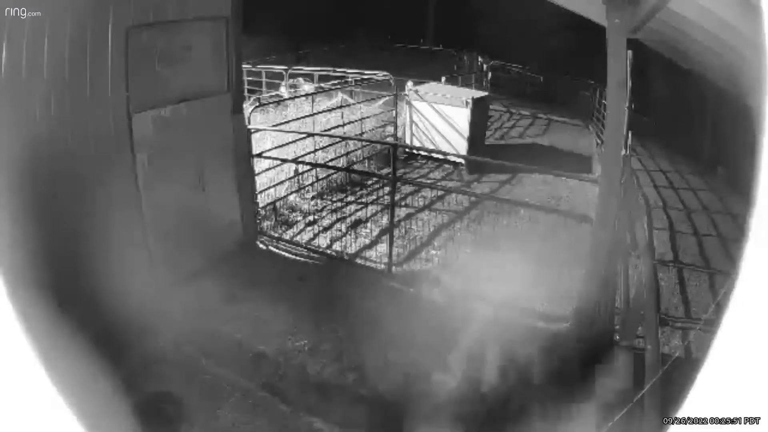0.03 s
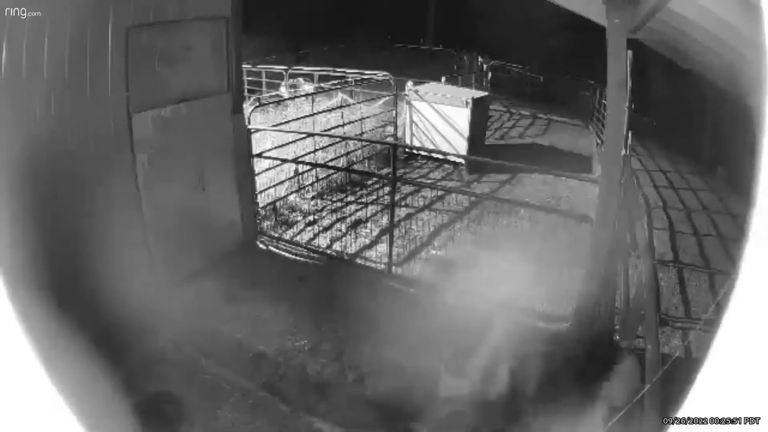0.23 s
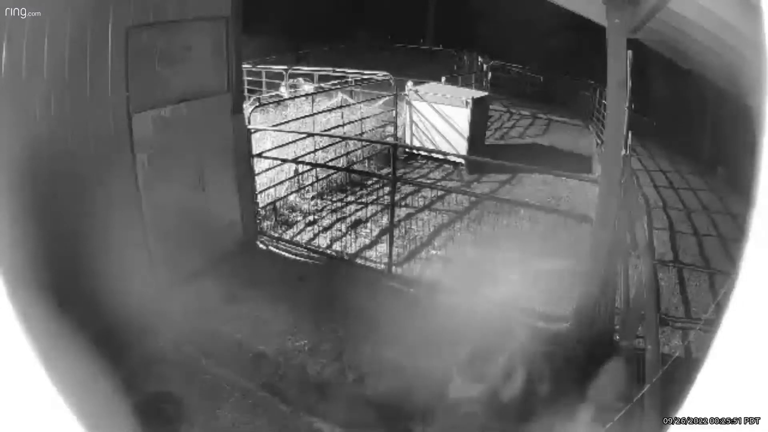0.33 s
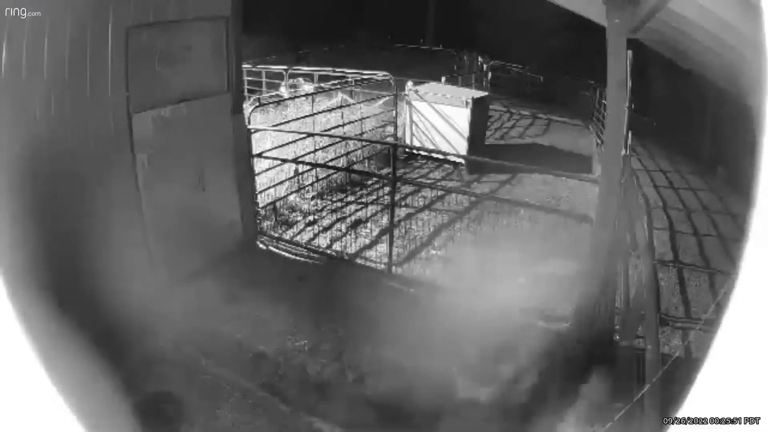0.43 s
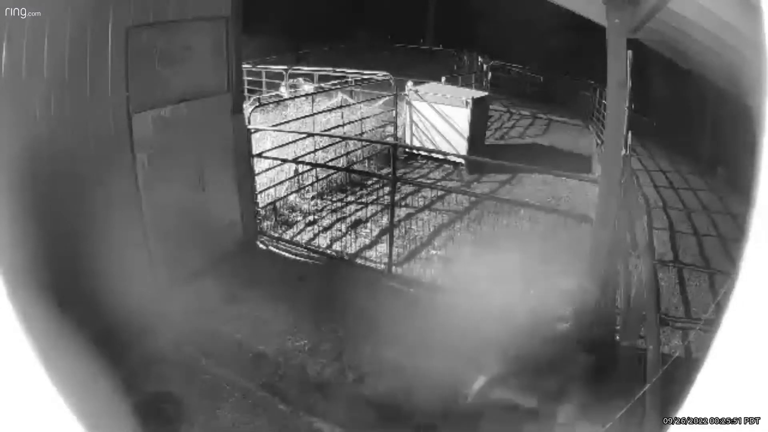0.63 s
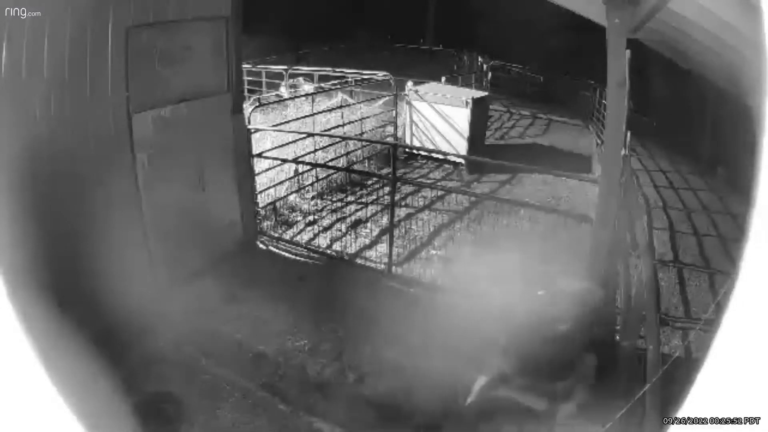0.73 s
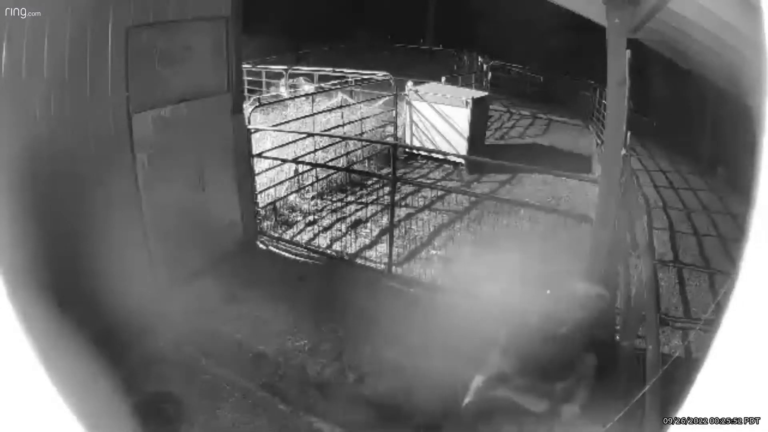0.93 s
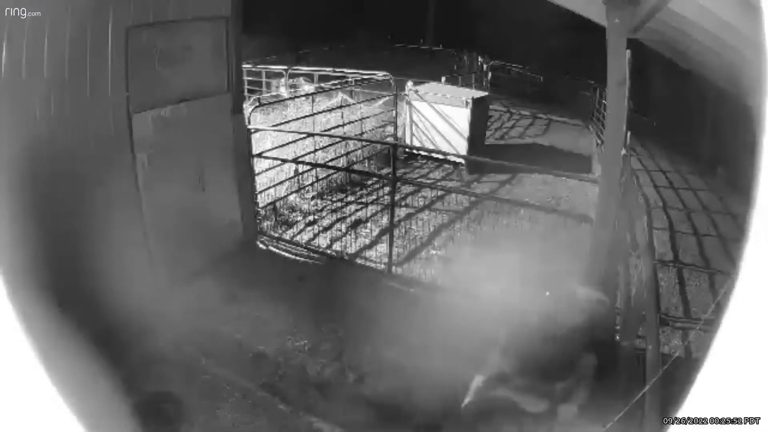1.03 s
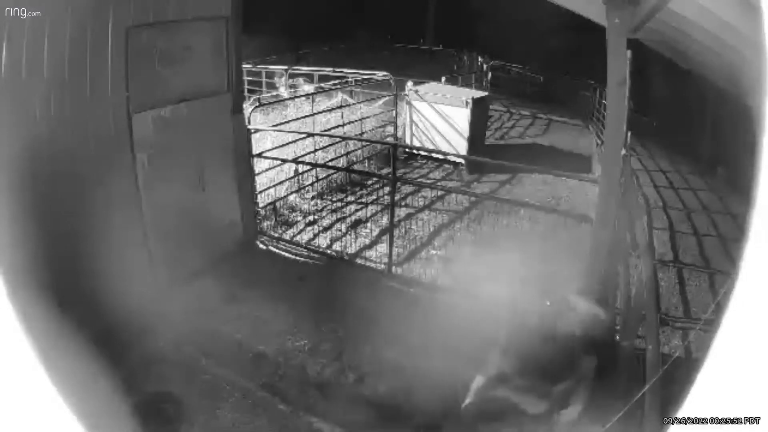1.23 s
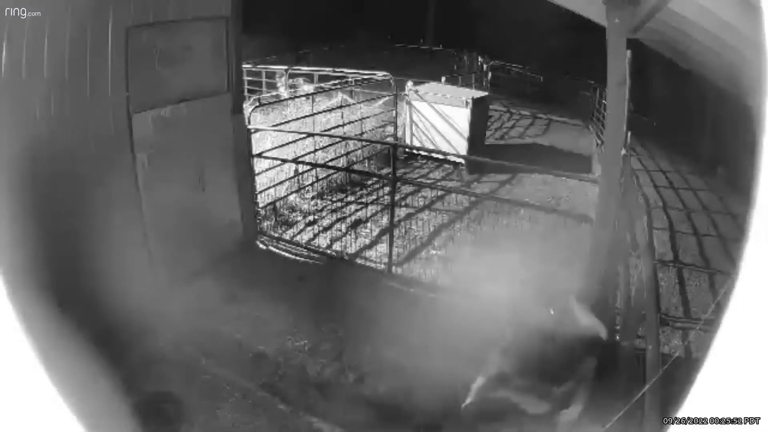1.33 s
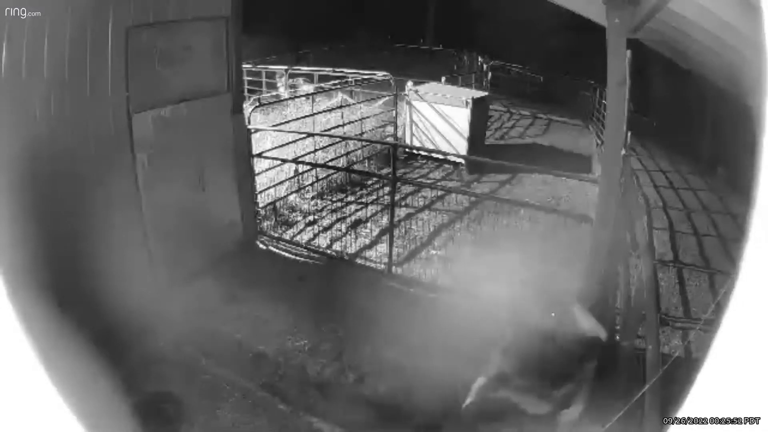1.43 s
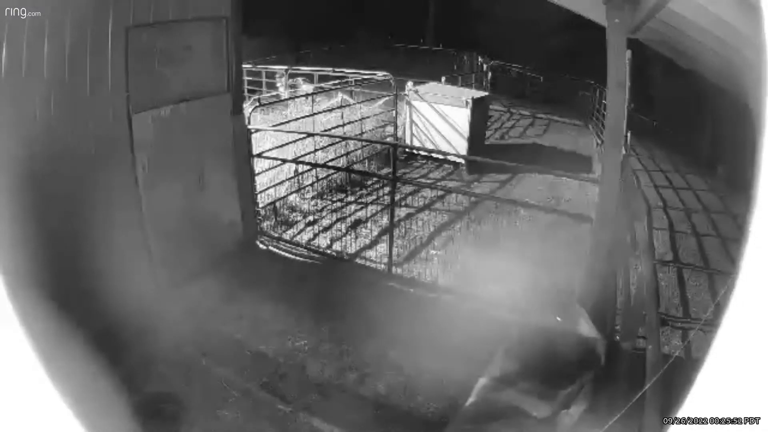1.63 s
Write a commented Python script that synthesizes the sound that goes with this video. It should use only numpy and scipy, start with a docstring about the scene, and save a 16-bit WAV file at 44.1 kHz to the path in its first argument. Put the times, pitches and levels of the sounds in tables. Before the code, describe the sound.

Loud clanging and chattering of sheet metal and loose bars, kicked by a horse.

```python
"""A faint hoof knock, then a rising scrape: a horse struggles against its sheet-metal stall wall.
It kicks: the panel booms and clangs, and loose bars and fittings chatter after every blow.
The metal rings out in the barn, a catch snaps, and the horse shuffles on with a faint squeal
of rubbed steel. Heard through a nearby security camera, over a still night."""
import sys
import numpy as np
from scipy import signal
from scipy.fft import rfft, irfft
from scipy.io import wavfile

SR = 44100
rng = np.random.default_rng(int(sys.argv[2]) if len(sys.argv) > 2 else 0)


def wrap_up_sound(samples):
    """Save the sound to the file named by the first command line argument, as 16-bit audio."""
    columns = np.atleast_2d(samples).T
    # keep every value between -1 and 1, then stretch to whole-number steps
    tamed = np.clip(columns, -1, 1)
    steps = np.round(tamed * 32767).astype(np.int16)
    wavfile.write(sys.argv[1], SR, steps)


N = 74970
T = np.arange(N) / SR

# still night (frequency [Hz], density [dB])
NIGHT_SPECTRUM = [(30, -10), (130, -5), (400, 0), (900, -26), (1900, -30), (2350, -2.5), (2800, -16),
                  (7000, -41)]
# hooves in the bedding (time [s], level [dB])
SHUFFLE_ENVELOPE = [(.09, -96), (.12, -59.5), (.2, -53), (1.2, -59), (1.35, -60), (1.52, -62), (1.6, -71),
                    (1.7, -97)]
# bedding (frequency [Hz], density [dB])
SHUFFLE_SPECTRUM = [(30, -28), (80, -7), (160, 1), (450, 12.5), (900, -3), (2000, -22.5)]
# body and hooves on the wall (time [s], level [dB])
SCRAPE_ENVELOPE = [(.09, -82.5), (.108, -52), (.15, -46.5), (.2, -48), (.6, -23), (1.12, -44), (1.165, -48),
                   (1.2, -60), (1.26, -65.5), (1.32, -52.5), (1.40, -54.5), (1.46, -49), (1.53, -58),
                   (1.62, -60), (1.7, -55)]
# wall friction (frequency [Hz], density [dB])
SCRAPE_SPECTRUM = [(50, -21), (150, -14), (400, -1.5), (1000, 3), (1600, -1), (2300, -1), (3700, 3.5),
                   (5500, -1.5), (6500, -10), (7500, -30.5)]
# loose rails (start [s], release [s], centre [Hz], width [Hz], level [dB])
RAIL_NOTES = [(0.341, .40, 3260, 500, -34), (0.896, 1.047, 2920, 90.8, -39.5),
              (1.05, 1.525, 2880, 39.7, -67), (1.047, 1.624, 1024, 25, -65),
              (1.352, 1.741, 1667, 160, -59.5)]
# catch (time [s], level [dB], frequency [Hz])
CATCH_SNAPS = [(1.0421, -17.5, 4800), (1.0442, -9.5, 5560), (1.161, -30.5, 5600)]
# struck bars (time [s], frequency [Hz], level [dB], t60 [s])
BAR_STRIKES = [(0.204, 3220, -27.5, 0.07), (0.3496, 3440, -19, 0.13), (0.35, 3090, -27, .22),
               (.3505, 5400, -28, .025), (0.537, 951, -19, 0.29), (0.796, 1540, -13.5, 0.12),
               (0.984, 1423, -32.5, 0.29), (1.075, 1039, -34.5, 0.38), (1.21, 1045, -42.5, 0.32)]
# hoof knocks and a low panel boom (time [s], level [dB], centre [Hz], t60 [s], echo re note [dB])
KNOCK_NOTES = [(.009, -53.5, 375, 0.036, -0.5), (0.5138, -6, 941, 0.092, -0.5), (.529, -18, 786, 0.023, -1),
               (.624, -15, 420, 0.054, -0.5), (0.626, -18, 222.4, 0.14, -12), (.760, -13, 1280, 0.037, 0.5),
               (0.7929, -15, 1060, 0.066, -0.5), (1.316, -47.5, 338, 0.093, -0.5),
               (1.458, -39, 776, 0.021, 6.5)]
# wall panel (frequency [Hz], level [dB])
PANEL_MODES = [(147, -15.5), (172, -10), (200, -12), (225, -10), (283, -10.5), (364, -5.5), (388, -0.5),
               (406, -8.5), (451, 0.5), (487, -9.5), (556, -2.5), (619, -7), (807, -5.5), (899, -6.5)]
# panel thud (frequency [Hz], density [dB])
THUD_SPECTRUM = [(25, -36.5), (60, -23), (115, -25), (165, -4), (300, 0), (420, 11), (600, -3),
                 (1200, -21.5)]
# panel rumble (frequency [Hz], density [dB])
RUMBLE_SPECTRUM = [(25, -14), (65, 1.5), (105, -1), (170, 14), (300, -16), (900, -51)]
# sheet midrange (frequency [Hz], density [dB])
CLANG_SPECTRUM = [(100, -28), (300, -5.5), (650, -1.5), (1100, 0.5), (1700, -3), (2300, -6), (3200, -15),
                  (6000, -51)]
# sheet treble (frequency [Hz], density [dB])
CLATTER_SPECTRUM = [(500, -13), (1500, -2.5), (2500, -2), (3400, 3), (4700, 2), (5600, -4), (6500, -8),
                    (7600, -33)]
# steel gate, shaken by every blow (frequency [Hz], level [dB])
GATE_MODES = [(1072, -2), (1202, -0.5), (1301, -2), (1711, -1), (2228, -2), (2912, -2), (3064, 1),
              (3470, -1), (4081, -3), (4205, -4)]
# blows on the wall (time [s], boom [dB], clang [dB], clatter [dB], chatter time constant [s])
WALL_BLOWS = [(0.207, -33.5, -26.5, -26.5, 0.018), (0.246, -33, -29.5, -30, 0.062),
              (0.348, -37, -34.5, -30, 0.0055), (0.393, -30.5, -32.5, -35, .04),
              (0.441, -26.5, -34.5, -43, 0.12), (0.511, -19, -21.5, -22.5, 0.016),
              (.532, -23.5, -46, -21.5, 0.013), (.566, -26, -17.5, -24, 0.034),
              (0.626, -19, -24.5, -17, 0.033), (.644, -23, -26, -21, 0.023),
              (0.687, -27.5, -21.5, -17.5, 0.019), (0.751, -18, -19.5, -22, 0.021),
              (0.789, -22, -19, -21.5, 0.014), (.840, -26, -19, -19.5, 0.007),
              (.910, -27.5, -32, -51, 0.032), (.980, -36.5, -38.5, -51.5, 0.039),
              (1.073, -48, -64, -66, 0.025)]


def undb(db):
    """Decibels to gain."""
    return 10 ** (np.asarray(db) / 20)


def unit(x):
    """Scale to unit energy."""
    return x / np.sqrt(np.sum(x ** 2) + 1e-18)


def level(x, rms_db):
    """Scale to an rms level."""
    return unit(x) * np.sqrt(N) * undb(rms_db)


def fade(t60_s):
    """Exponential decay."""
    return np.exp(-np.log(1000) * T / t60_s)


def envelope(points):
    """Gain curve through (time [s], level [dB]) points."""
    return undb(np.interp(T, *np.array(points).T))


def at(x, start_s):
    """Delay to a start time."""
    return np.concatenate([np.zeros(int(start_s * SR)), x])[:N]


def through(drive, response):
    """Convolve a drive with a body's response."""
    return signal.fftconvolve(drive, response)[:N]


def noise():
    """White noise."""
    return rng.standard_normal(N)


def colour(x, spectrum):
    """Filter by (frequency [Hz], density [dB]) points; unit rms."""
    hz, db = np.array(spectrum, float).T
    bins_hz = np.arange(N // 2 + 1) * SR / N
    gain = undb(np.interp(np.log(bins_hz + 1), np.log(hz), db))
    return level(irfft(rfft(x) * gain, N), 0)


def resonate(x, hz, stage_width_hz):
    """Two resonators in series."""
    b, a = signal.iirpeak(hz, hz / stage_width_hz, fs=SR)
    return signal.lfilter(b, a, signal.lfilter(b, a, x))


def clicks(rate_per_s, scatter_db):
    """Random contacts of uneven strength."""
    hits = rng.random(N) < rate_per_s / SR
    return hits * np.sign(noise()) * undb(scatter_db * noise())


def ring(modes, t60_s):
    """Freely decaying modes; unit energy."""
    tones = sum(undb(db) * np.sin(2 * np.pi * (hz * T + rng.random())) for hz, db in modes)
    return unit(tones * fade(t60_s))


def night(rms_db=-84):
    """Still night: steady low noise and a thin high band."""
    return colour(noise(), NIGHT_SPECTRUM) * undb(rms_db)


def shuffling():
    """Hooves drag dully through the bedding."""
    return colour(noise(), SHUFFLE_SPECTRUM) * envelope(SHUFFLE_ENVELOPE)


def scraping():
    """Stick-slip grains, each a burst of hiss, follow the body's pressure on the wall."""
    slips = clicks(rate_per_s=1300, scatter_db=1.5)
    power = through(slips ** 2, fade(t60_s=0.034) ** 2)
    grains = noise() * np.sqrt(np.abs(power))
    return colour(grains, SCRAPE_SPECTRUM) * envelope(SCRAPE_ENVELOPE)


def rails(attack_s=0.031, release_s=0.05, steadiness=0.25):
    """Loose rails rattle after a clink, or ring and squeal roughly."""
    out = 0
    for start_s, end_s, hz, width_hz, db in RAIL_NOTES:
        note = resonate(noise(), hz, width_hz)
        note /= (np.abs(signal.hilbert(note)) + 1e-9) ** steadiness
        attack = np.clip((T - start_s) / attack_s, 0, 1)
        release = np.exp(-np.maximum(T - end_s, 0) / release_s)
        out += level(note, db) * attack * release
    return out


def catch(t60_s=0.0045):
    """A catch snaps: tiny dry ticks right by the microphone."""
    return sum(at(undb(db) * np.sin(2 * np.pi * hz * T) * fade(t60_s), start_s)
               for start_s, db, hz in CATCH_SNAPS)


def bars(beat_hz=23, upper_db=-15.5, attack_s=0.0016):
    """Struck steel bars ring with a close pair of modes that beat."""
    attack = 1 - np.exp(-T / attack_s)
    out = 0
    for start_s, hz, db, t60_s in BAR_STRIKES:
        lower = np.sin(2 * np.pi * hz * T)
        upper = undb(upper_db) * np.sin(2 * np.pi * ((hz + beat_hz) * T + rng.random()))
        out += at(undb(db) * (lower + upper) * fade(t60_s) * attack, start_s)
    return out


def knocks(echo_t60_s=0.33, low_cut_ratio=0.42):
    """Hoof knocks and a low boom of the wall panel: each a short hollow note and its echo."""
    out = 0
    for start_s, db, hz, t60_s, echo_db in KNOCK_NOTES:
        note = np.sin(2 * np.pi * hz * T) * fade(t60_s)
        echo = unit(resonate(noise() * fade(echo_t60_s), hz, stage_width_hz=hz))
        echo *= undb(echo_db) * np.linalg.norm(note)
        low_cut = signal.butter(2, hz * low_cut_ratio, "high", fs=SR, output="sos")
        out += undb(db) * at(signal.sosfilt(low_cut, note + echo), start_s)
    return out


def panel(thud_db=-3, rumble_db=-18.5, attack_s=0.0039):
    """Whole-panel response: low modes over a thud and a lingering rumble."""
    thud = undb(thud_db) * unit(colour(noise(), THUD_SPECTRUM) * fade(t60_s=0.57))
    rumble = undb(rumble_db) * unit(colour(noise(), RUMBLE_SPECTRUM) * fade(t60_s=1.09))
    modes = ring(PANEL_MODES, t60_s=0.43)
    attack = 1 - np.exp(-T / attack_s)
    return unit((modes + thud + rumble) * attack)


def sheet(spectrum, t60_s, modes_per_hz=0.12, wash_db=1.5, contact_db=-11):
    """Thin-steel response: a sharp contact, then crowded modes in a wash of barn echoes."""
    mode_bins = rng.random(N // 2 + 1) < modes_per_hz * SR / N
    phasors = np.exp(2j * np.pi * rng.random(N // 2 + 1))
    modes = colour(irfft(mode_bins * phasors, N), spectrum)
    wash = undb(wash_db) * colour(noise(), spectrum)
    tail = unit((modes + wash) * fade(t60_s))
    contact = undb(contact_db) * unit(colour(noise(), spectrum) * fade(t60_s=0.0077))
    return unit(tail + contact)


def wall(gate_db=-11.5, chatter_db=4.5):
    """Each blow is one push and a dying chatter of loose parts; all drive the same metal."""
    boom = panel()
    clang = sheet(CLANG_SPECTRUM, t60_s=0.55) + undb(gate_db) * ring(GATE_MODES, t60_s=0.55)
    clatter = sheet(CLATTER_SPECTRUM, t60_s=0.41)
    drives = np.zeros((3, N))
    for start_s, boom_db, clang_db, clatter_db, decay_s in WALL_BLOWS:
        chatter = clicks(rate_per_s=450, scatter_db=4.5) * np.exp(-T / decay_s)
        force = undb(chatter_db) * unit(chatter)
        force[0] += 1  # the push
        drives += undb([boom_db, clang_db, clatter_db])[:, None] * at(unit(force), start_s)
    gain = np.sqrt(SR / 20)  # unit energy to unit rms over 50 ms
    return gain * sum(through(drive, body) for drive, body in zip(drives, (boom, clang, clatter)))


def scene():
    """Stall metal and horse over the night; mono."""
    metal = wall() + bars() + rails() + catch()
    return (metal + knocks() + scraping() + shuffling() + night())[None]


def record(dry):
    """The camera rounds the loudest peaks and cuts the top."""
    top_hz = 7400
    low_pass = signal.ellip(10, 0.2, 80, top_hz, fs=SR, output="sos")
    return signal.sosfilt(low_pass, np.tanh(dry))


dry = scene()
out = record(dry)
wrap_up_sound(out)
```